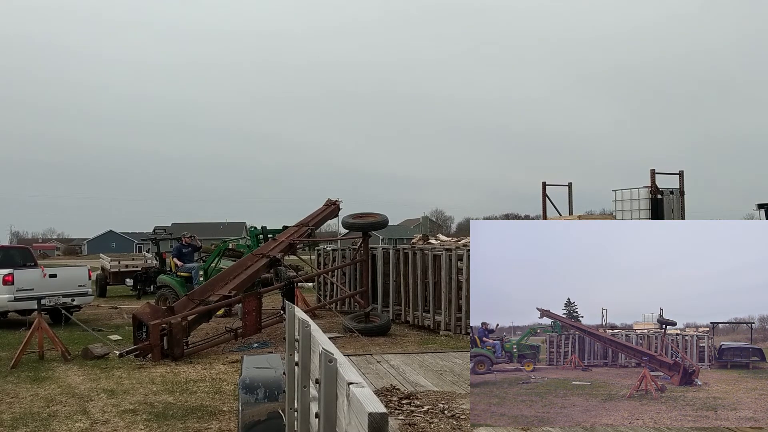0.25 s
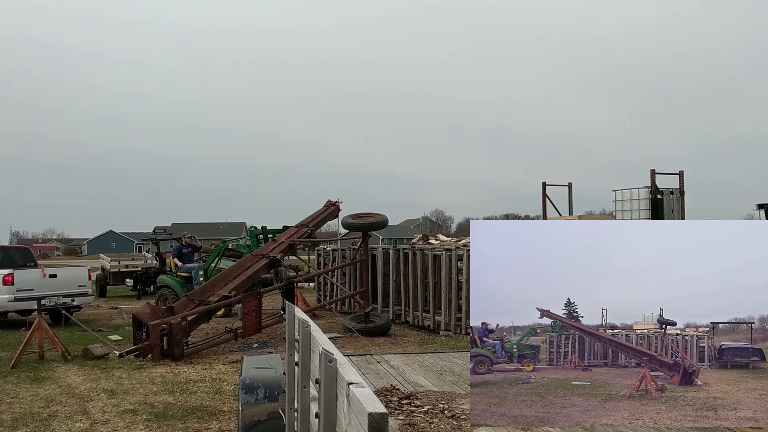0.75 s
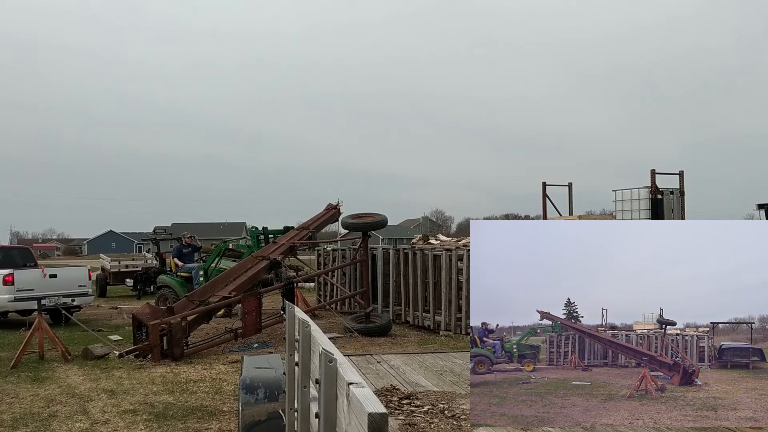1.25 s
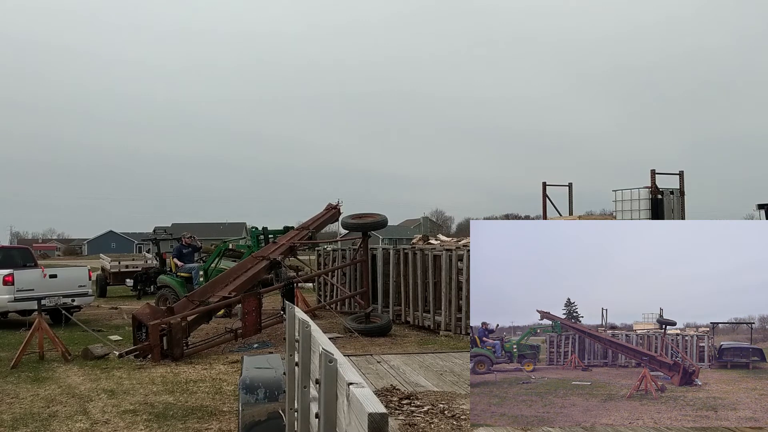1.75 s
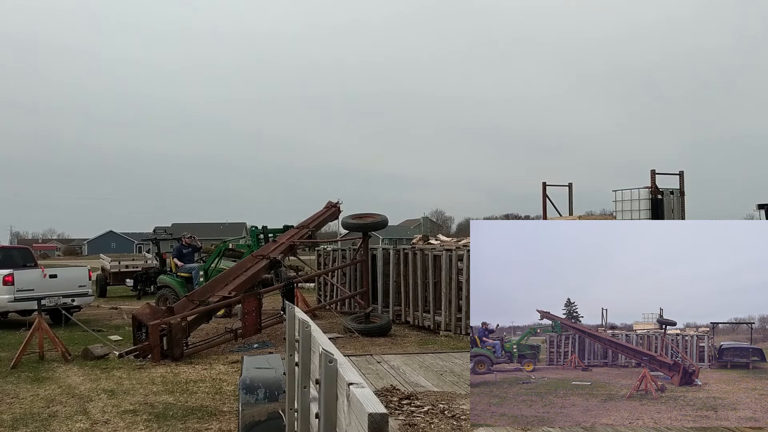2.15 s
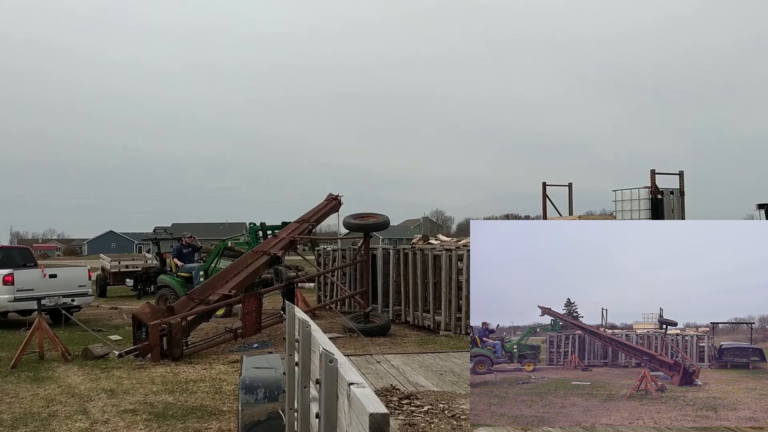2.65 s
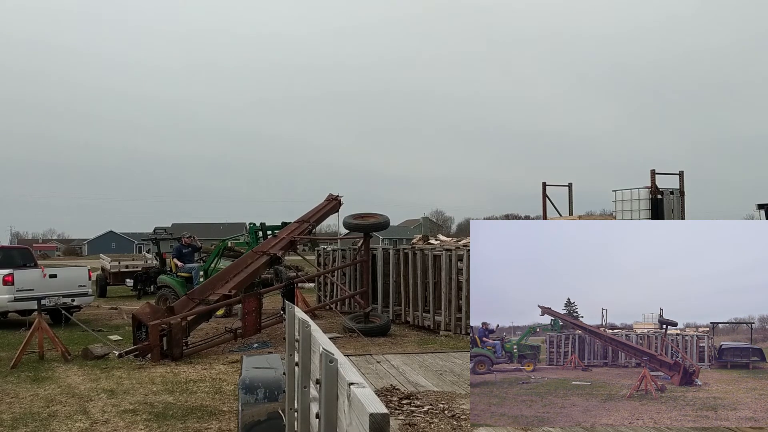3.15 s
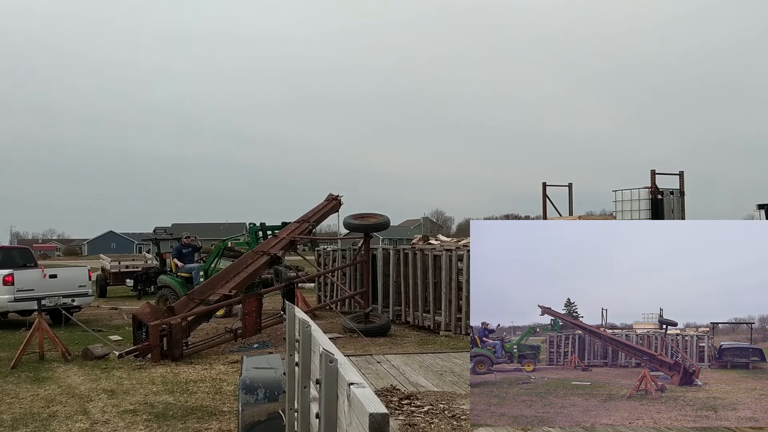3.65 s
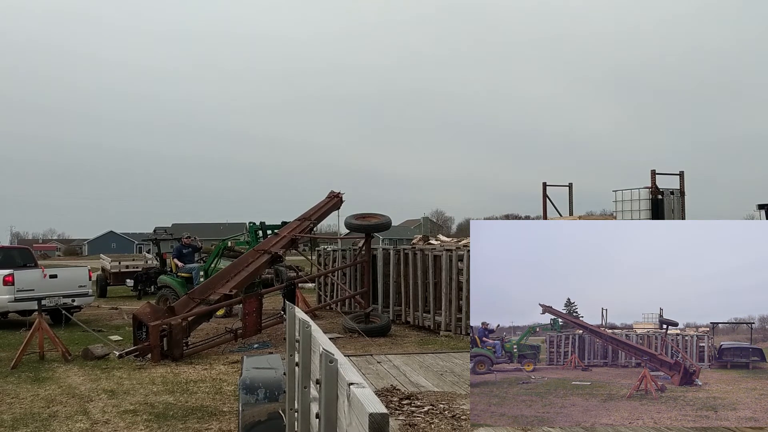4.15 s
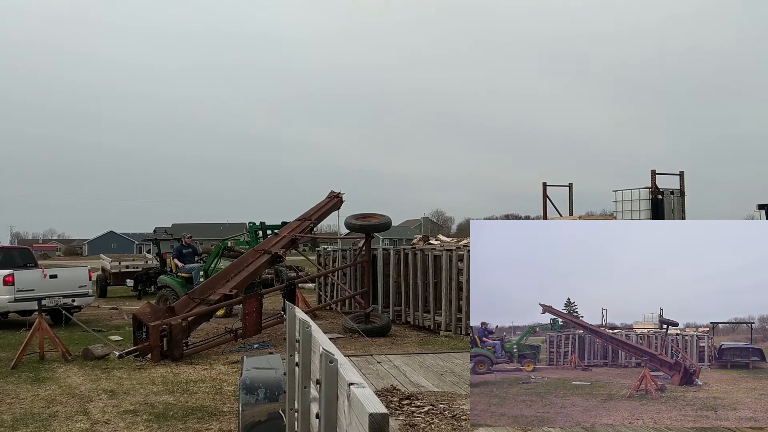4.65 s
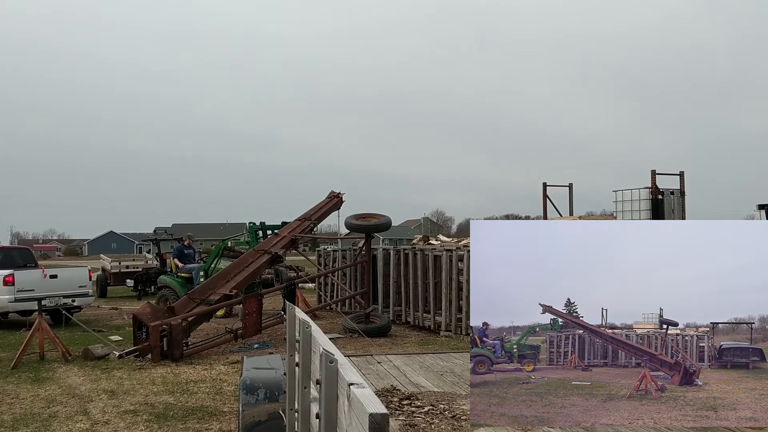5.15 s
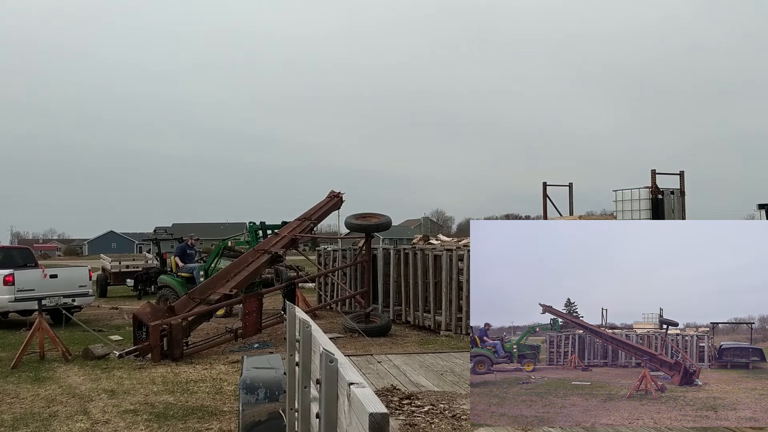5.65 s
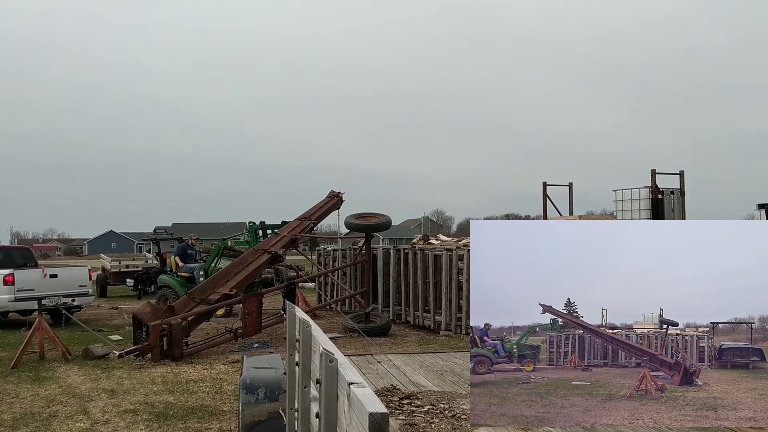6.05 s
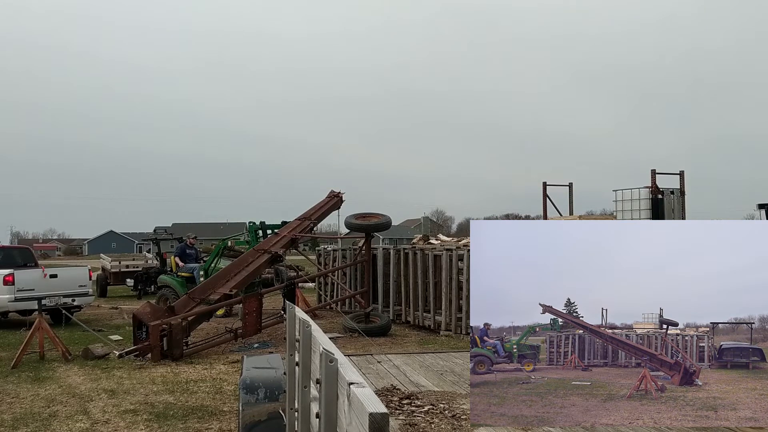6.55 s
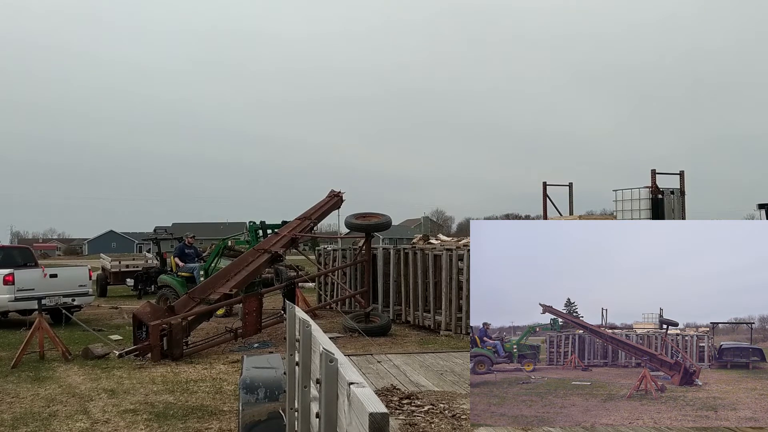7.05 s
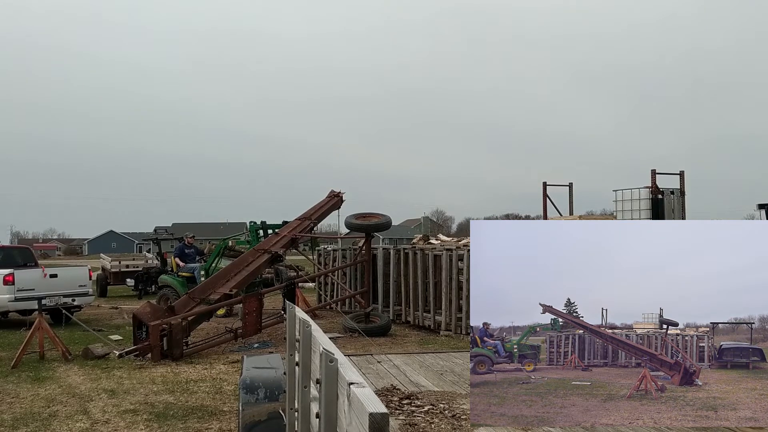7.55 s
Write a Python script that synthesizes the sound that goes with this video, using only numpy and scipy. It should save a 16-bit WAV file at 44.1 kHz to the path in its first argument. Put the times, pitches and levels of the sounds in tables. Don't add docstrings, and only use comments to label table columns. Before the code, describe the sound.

A three-cylinder diesel tractor idles along steadily at a moderate distance in an open farmyard, a low droning chug of about 54 firings a second with block clatter and an intermittent loose tappet ping. Wind buffets and thumps the microphone in low soft bumps, most often in the first four seconds. At 1.55 s steel clanks sharply with a puff of rust, then a dull thud. Around 2 s faint ticks lead to the loudest drag, 2.2-2.95 s: rough slow slips, bright ringing sheet and grinding rust, as the engine sags then briefly overshoots. From 3.45 to 4.4 s a longer, lower scrape groans and sings near 400 Hz, with dry flake clicks and a brighter ringing end. Engine and wind continue alone; small bird chirps at 5.65 and 6.0 s, a thin whistle at 7 s. From 7.2 to 7.8 s rapid regular slips become a stuttering squeal. Sheds return a brief echo.

```python
import sys
import numpy as np
from scipy import signal
from scipy.fft import rfft, irfft, next_fast_len
from scipy.io import wavfile
from scipy.ndimage import uniform_filter1d, map_coordinates

SR = 44100
rng = np.random.default_rng(int(sys.argv[2]) if len(sys.argv) > 2 else 0)


def nominal_scale(level):
    x = np.asarray(level, float) / 20
    return 10 ** x


def dump_mix(stems):
    frames = np.atleast_2d(stems).T
    limited = np.clip(frames, -1, 1)
    pcm = np.round(limited * 32767).astype(np.int16)
    wavfile.write(sys.argv[1], SR, pcm)


N = 343980


def noise():
    return rng.standard_normal(N)


def unit(x):
    return x / np.sqrt(np.mean(x ** 2) + 1e-20)


def along(points, hz):
    f, v = np.transpose(points)
    return np.interp(np.log(hz + 1), np.log(f + 1), v)


def curves(rows):
    s, *cols = np.transpose(rows)
    t = np.arange(N) / SR
    gate = uniform_filter1d(1. * (t > s[0]) * (t < s[-1]), size=300)
    return [np.interp(t, s, c) for c in cols] + [gate]


def wobble(rate):
    at = np.arange(0, N + 32, 32)
    knots = rng.standard_normal(int(N * rate / SR) + 4)
    return np.interp(np.arange(N), at, map_coordinates(knots, [at * rate / SR]))


def filtered(x, response):
    m = next_fast_len(len(x) + 8192)
    return irfft(rfft(x, m) * response(np.fft.rfftfreq(m, 1 / SR)), m)[:len(x)]


def modes(peaks, f):
    total = 0
    for k, (c, w, db) in enumerate(peaks):
        total = total + (-1) ** k * nominal_scale(db) * 1j * f * w / (c * c - f * f + 1j * f * w + 1e-9)
    return total


def lifted(peaks, f):
    return nominal_scale(sum(db / (1 + (2 * (f - c) / w) ** 2) for c, w, db in peaks))


def patchy(x, depth_db):
    z = signal.stft(x, nperseg=256)[2]
    field = uniform_filter1d(rng.standard_normal(z.shape), size=4, axis=0)
    field = uniform_filter1d(field, size=7, axis=1)
    return signal.istft(z * nominal_scale(depth_db * unit(field)), nperseg=256)[1][:N]


def bursts(slips, t60):
    hits, t = np.zeros(N), np.arange(4000) / SR
    for s, db in slips:
        hits[round(s * SR)] = nominal_scale(db)
    return signal.fftconvolve(hits, nominal_scale(-60 * t / t60) * (1 - np.exp(-t / 0.0018)))[:N]


def rings(slips, sheet, t60, vary=1):
    out, t = np.zeros(N + SR), np.arange(3000) / SR
    hz, _, level = np.transpose(sheet)[:, :, None]
    chance = vary * rng.standard_normal((len(slips), 3, len(sheet), 1))
    shape = nominal_scale(-60 * t / t60) * (1 - np.exp(-t / 0.0015)) ** 2
    spread = .35 * vary * np.arange(len(sheet))[:, None] ** 2
    for (s, db), (size, tune, phase) in zip(slips, chance):
        turn = 2 * np.pi * hz * (1 + .003 * tune) * (t - .0025)
        ring = nominal_scale(level + size) * np.sin(turn + .45 * phase + spread)
        struck = shape * ring.sum(axis=0)
        out[round(s * SR):][:len(t)] += nominal_scale(db) * struck / abs(struck).max()
    return out[:N]


def wind():
    # t/s, level/dB
    gusts = [(0.0, -22), (0.03, -35), (0.4, -32), (0.8, -36), (1.15, -29), (1.3, -34.5), (1.8, -40.5),
             (2.2, -37), (2.9, -38), (3.3, -37.5), (3.7, -36), (4.2, -35.5), (5.5, -46), (5.7, -36),
             (6.1, -39.5), (6.55, -42), (7.2, -40), (7.8, -36.5)]
    # f/Hz, density/dB per Hz
    buffet = [(12, -56), (20, -31), (34, 10), (65, 8.5), (274, -9.5), (404, -21), (441, -20), (468, -21.5),
              (700, -35.5), (910, -49), (1540, -120)]
    # t/s, peak level/dB, f/Hz
    thumps = [(0.132, -15, 94), (0.155, -14, 67.3), (0.225, -13.5, 150), (0.497, -15.5, 95.5),
              (0.879, -10, 181), (0.984, -16, 91.5), (1.072, -13.5, 136), (1.141, -11, 84.5),
              (1.524, -19.5, 128), (1.595, -12, 126), (1.992, -20.5, 129), (2.299, -16, 111),
              (2.769, -14.5, 121), (2.909, -13, 183), (3.004, -10, 182), (3.18, -14, 198),
              (3.584, -12, 116), (3.62, -10, 152), (3.933, -16, 95), (4.075, -10.5, 107),
              (4.102, -11.5, 65.4), (5.887, -15.5, 136), (5.955, -19, 102), (6.048, -18, 86.1),
              (6.11, -15, 109), (6.281, -20, 61.6), (6.63, -16, 75.4), (6.971, -20, 113), (7.081, -20, 72),
              (3.834, -19, 80), (0.536, -17, 260)]
    swell_db, swell_s = -17, 0.022
    gust_db, _ = curves(gusts)
    t = np.arange(0, N, 64) / SR
    swell = sum(nominal_scale(2 * (db + swell_db)) * np.exp(-((t - s) / swell_s) ** 2) for s, db, _ in thumps)
    strength = np.sqrt(nominal_scale(2 * gust_db) + np.interp(np.arange(N) / SR, t, swell))
    rumble = filtered(noise(), lambda f: nominal_scale(along(buffet, f)))
    power = uniform_filter1d(uniform_filter1d(rumble ** 2, size=1500), size=1500)
    even = rumble / np.sqrt(abs(power) + 1e-9)
    even = filtered(even, lambda f: f ** 6 / (f ** 6 + 46. ** 6))
    out = strength * nominal_scale(1.5 + 1.7 * wobble(25)) * unit(even)
    for s, db, hz in thumps:
        u = np.linspace(-2, 2, round(4 * SR / hz))
        start = round((s + .0105) * SR) - len(u) // 2
        out[start:start + len(u)] += nominal_scale(db - 3.5) * np.sin(2 * np.pi * u) * np.exp(-(u / 0.62) ** 2)
    return out


def bird():
    # t/s, f/Hz, level/dB
    whistle = [(6.935, 3760, -68), (6.955, 3830, -54), (6.99, 3830, -56), (7.01, 3870, -62),
               (7.03, 3892, -53), (7.07, 3885, -57), (7.11, 3885, -62), (7.135, 3970, -66)]
    # t/s, f/Hz, level/dB
    chirps = [
        (5.657, 4300, -51),
        (5.978, 4300, -50),
    ]
    hz, db, gate = curves(whistle)
    t = np.arange(N) / SR
    short = np.zeros(N)
    for s, chirp_hz, level in chirps:
        u = t - s
        short += nominal_scale(level) * np.exp(-(u / .006) ** 2) * np.sin(2 * np.pi * chirp_hz * u * (1 - 3 * u))
    phase = 2 * np.pi * np.cumsum(hz) / SR + .4 * wobble(50)
    return gate * nominal_scale(db + 3.0 + wobble(60)) * np.sin(phase) + short


def turns():
    # t/s, four-stroke cycles/Hz
    speed = [(0, 18.11), (1.7, 18.11), (2.08, 17.6), (2.72, 17.48), (2.86, 18.1), (3.0, 18.36), (3.2, 18.1),
             (3.65, 18.11), (4.1, 18.0), (4.35, 18.115), (7.8, 18.11)]
    return np.cumsum(curves(speed)[0]) / SR


def engine():
    # multiple of the engine cycle, level/dB
    exhaust = [(1, -30), (2, -29), (3, 1), (4, -26), (5, -18), (6, -0.5), (7, -17), (8, -21), (9, -30),
               (10, -14.5), (11, -28), (12, -2), (13, -4.5), (14, -19.5), (15, 0), (17, -12.5), (18, -18.5),
               (20, -27), (22, -33), (24, -8), (25, -15.5), (26, -29), (27, -20), (28, -34), (29, -28.5),
               (30, -37), (31, -25.5), (32, -21), (33, -47), (34, -43)]
    # f/Hz, density/dB per Hz
    block = [(60, -12), (150, -13.5), (250, -10.5), (400, -7), (560, -14.5), (900, -15), (1150, -21.5),
             (2400, -25), (3500, -27.5), (4500, -30), (5800, -24), (6900, -26), (8300, -46.5), (15600, -51)]
    # f/Hz, width/Hz, level/dB
    panels = [(231, 16, 8), (447, 47, -20.5), (842, 17, 7), (1694, 56, 6.5), (2015, 46, 7.5), (2170, 33, 6),
              (2860, 430, 7.5), (5150, 230, 7), (5810, 200, 5), (6270, 200, 0.5), (6730, 150, 3)]
    cylinders = [0, -3, -2.5]
    cycle = turns() + .0015 * wobble(2)
    tones = np.zeros(N)
    for k, db in exhaust:
        sway = nominal_scale(.9 * wobble(5))
        phase = 2 * np.pi * (k * cycle + rng.random()) + 0.5 * wobble(7.3)
        tones += nominal_scale(db) * sway * np.sin(phase)
    firing = 3 * cycle + 3
    count = firing.astype(int)
    since = firing % 1
    uneven = 1.2 * rng.standard_normal(count.max() + 1)[count]
    strength = nominal_scale(np.array(cylinders)[count % 3] + uneven)
    knock = strength * (1 - np.exp(-7 * since)) * np.exp(-2.5 * since)
    steps = round(SR / 18.105)
    habit = rng.standard_normal(steps + 1)[(cycle % 1 * steps).astype(int)]
    habit = filtered(habit, lambda f: 1 / (1 + (f / 4000) ** 4))
    mix = noise() + 1.3 * habit
    colour = lambda f: nominal_scale(along(block, f)) * lifted(panels, f)
    above = lambda f: colour(f) * f ** 2 / (f ** 2 + 1500.0 ** 2)
    roar = unit(filtered(noise() + .6 * np.roll(habit, 700), colour))
    clatter = unit(filtered(unit(knock * mix), above))
    out = nominal_scale(-32.0) * unit(tones)
    out += nominal_scale(-44.0) * patchy(roar, depth_db=1.0)
    return out + nominal_scale(-54.5) * patchy(clatter, depth_db=4.5)


def tappet():
    s = np.interp(np.arange(.22, turns()[-1] - 1, 2 / 3), turns(), np.arange(N) / SR)
    fits = 3.2 * wobble(6)[(s * SR).astype(int)] + 2.5 * rng.standard_normal(len(s))
    return rings(np.transpose([s, fits - 49]), [(2720, 0, -3), (2880, 0, 0), (3050, 0, -4)], t60=.045)


def yard(x):
    # f/Hz, t60/s
    decay = [(300, 0.24), (3000, 0.34), (10000, 0.019)]
    hz, t, z = signal.stft(rng.standard_normal(SR // 2), SR, nperseg=256)
    tail = signal.istft(z * nominal_scale(-60 * t / along(decay, hz)[:, None]), SR, nperseg=256)[1]
    return signal.fftconvolve(np.pad(x, (800, 0)), tail / np.linalg.norm(tail))[:N]


def snaps():
    # t/s, peak level/dB, low part/dB
    flakes = [(3.4695, -39, 11), (3.6354, -34.5, 2), (3.7461, -40, 3), (3.838, -41, 6), (3.8819, -41, 3),
              (4.0595, -44, 2), (4.1518, -46, 6), (4.1687, -43, 10), (4.2205, -38, 14), (4.255, -42, -1),
              (4.2627, -41, -3)]
    high = bursts([(s, db) for s, db, _ in flakes], .02)
    low = bursts([(s, db + low_db) for s, db, low_db in flakes], 0.035)
    top = filtered(high * noise(), lambda f: nominal_scale(7.5) / (1 + (8500 / (f + 1)) ** 6))
    return top + filtered(low * noise(), lambda f: nominal_scale(13.0) * f / (f + 900) / (1 + (f / 6000) ** 6))


def creep():
    # f/Hz, width/Hz, level/dB
    tick_modes = [(5600, 0, -8), (5800, 0, -3), (6200, 0, -5)]
    s = np.arange(1.96, 2, 0.028)
    db = np.interp(s, (1.96, 2), (-47, -35)) + 2.0 * rng.standard_normal(40)[:len(s)]
    return rings(np.transpose([s, db]), tick_modes, t60=0.098)


def jolt():
    # t/s, peak level/dB
    tug = [
        (1.5475, -21.5),
    ]
    # f/Hz, width/Hz, level/dB
    tug_modes = [(750, 88, 0), (2080, 31, -5), (4480, 31, -2), (5180, 38, -13), (5930, 34, -1),
                 (6350, 35, -12), (6800, 34, -2), (7400, 40, -8), (10600, 65, -21)]
    # f/Hz, width/Hz, level/dB
    thud_modes = [(200, 0, -11), (278, 0, 7), (375, 0, 3)]
    dust = lambda f: f / (f + 500) / (1 + (f / 7400) ** 10) + nominal_scale(-25)
    puff = filtered(bursts(tug, 0.17) * noise(), dust)
    thud = rings([(1.614, -16.5), (1.623, -20.5)], thud_modes, t60=0.031)
    return rings(tug, tug_modes, t60=0.036) + nominal_scale(-7.5) * puff + thud


def strained(rows, rough, rate):
    hz, db, gate = curves(rows)
    level = nominal_scale(db + 2.5 + 3.5 * wobble(rate))
    return gate * level * np.sin(2 * np.pi * np.cumsum(hz) / SR + rough * wobble(rate))


def squeal(rows, upper_db, rough):
    hz, db, octave_db, gate = curves(rows)
    phase = 2 * np.pi * np.cumsum(hz) / SR + rough * wobble(60)
    flicker = lambda: nominal_scale(2.7 * wobble(45))
    high = 0.69 * flicker() * np.sin(3 * phase) + flicker() * np.sin(4 * phase)
    upper = flicker() * np.sin(2 * phase) + nominal_scale(upper_db) * high
    return gate * (nominal_scale(db + 1.5) * flicker() * np.sin(phase) + nominal_scale(octave_db - 4.0) * upper)


def resting(slips):
    rest_s, db_per_s, most_db = .021, 400, 6
    s, t = np.sort([0.] + [s for s, _ in slips]), np.arange(N) / SR
    since = t - s[np.searchsorted(s, t, side="right") - 1]
    return uniform_filter1d(np.clip(db_per_s * (since - rest_s), 0, most_db), size=60)


def drag(rows, slips, sheet, edge, vary, frame, strut, share, strut_db, rub_db, slip_db, crack_db, t60):
    # f/Hz, density/dB per Hz
    rust = [(1760, -66), (3000, -7), (3420, -14), (3820, -10.5), (4290, -7), (4920, -6.5), (6100, -3.5),
            (7000, 0), (8250, -20.5), (8840, -23.5), (10800, -22), (11900, -27.5), (15600, -33)]
    grate_db, groan_db, gate = curves(rows)
    middle_db = share * grate_db + (1 - share) * groan_db + strut_db
    norm = lambda x: x / np.sqrt(np.mean(x[gate > .5] ** 2))
    jerk = bursts(slips, t60)
    bright = lambda f: nominal_scale(along(rust, f)) * lifted(edge, f)
    rub = unit(filtered(noise(), lambda f: bright(f) * (2.0 + abs(modes(sheet, f)))))
    crack = unit(filtered(noise(), bright))
    effort = gate * nominal_scale(grate_db + rub_db - resting(slips) + 1.0 * wobble(160))
    grate = effort * patchy(rub, depth_db=2.5) + nominal_scale(crack_db) * jerk * crack
    pulse = gate * (4.3 + norm(jerk / nominal_scale(grate_db)))
    body = lambda f: modes(frame, f) + 0.26 * f * f / (f * f + 180.0 ** 2) / (1 + (f / 1400) ** 2)
    bars = lambda f: modes(strut, f) + 0.4 * f * f / (f * f + 1150.0 ** 2) / (1 + (f / 3800) ** 4)
    groan = nominal_scale(groan_db + 2.5) * norm(filtered(pulse * noise(), body))
    middle = nominal_scale(middle_db - 3.0) * norm(filtered(pulse * noise(), bars))
    return grate + nominal_scale(slip_db) * rings(slips, sheet, t60, vary) + groan + middle


def first_drag():
    # t/s, rubbing effort/dB, load on the frame/dB
    stroke = [
        (2.225, -39, -41),
        (2.237, -22.5, -38.5),
        (2.32, -21, -35),
        (2.545, -17, -36.5),
        (2.605, -19, -39.5),
        (2.72, -26.5, -35),
        (2.861, -31, -44.5),
        (2.873, -28, -45),
        (2.95, -44, -49),
    ]
    # t/s, peak level/dB
    slips = [(2.2355, -17.5), (2.2598, -18), (2.2711, -17), (2.2828, -18), (2.3008, -16), (2.3143, -16),
             (2.3286, -14), (2.3484, -15), (2.3681, -13), (2.387, -17), (2.4057, -15), (2.4265, -15),
             (2.4514, -16), (2.4679, -16), (2.4863, -12), (2.5048, -18), (2.5254, -17), (2.5498, -15),
             (2.5685, -14), (2.5889, -11), (2.6104, -9), (2.6315, -18), (2.6569, -14), (2.6794, -19),
             (2.7048, -21), (2.7314, -19), (2.7877, -26), (2.8643, -23)]
    # f/Hz, width/Hz, level/dB
    sheet = [(4100, 150, -16), (4480, 89, -10), (4850, 60, -16), (6110, 54, -2), (5880, 59, -2.5),
             (6116, 80, -1), (6480, 60, -8), (6670, 53, -5), (6770, 66, -1.5), (7160, 80, -12),
             (9840, 97, -23.5), (10700, 170, -23.5), (13000, 120, -29)]
    edge = [(9900, 150, 4), (10400, 200, 6), (13000, 200, 6)]
    frame = [(283, 54, -1), (525, 98, -3), (690, 105, -3), (1035, 210, -6)]
    strut = [(1790, 49, -10), (2096, 24, 5), (2440, 53, -7), (2940, 60, -1.5)]
    # t/s, f/Hz, level/dB
    brace = [(2.24, 2130, -48), (2.346, 2090, -43), (2.488, 2310, -40), (2.542, 2230, -45),
             (2.604, 2280, -40), (2.668, 2320, -44), (2.75, 2220, -52)]
    # t/s, f/Hz, level/dB
    rivets = [
        [(2.68, 7880, -61), (2.71, 7780, -52), (2.745, 7780, -56), (2.775, 7900, -53), (2.87, 7700, -62)],
        [(2.72, 7040, -50), (2.79, 7100, -40), (2.83, 7050, -57), (2.92, 7000, -57)],
    ]
    out = drag(stroke, slips, sheet, edge, .7, frame, strut, share=0.67, strut_db=-7.5,
               rub_db=-9.5, slip_db=1.5, crack_db=-13, t60=0.041)
    out += strained(brace, rough=2.2, rate=140)
    return out + sum(strained(rows, rough=.6, rate=50) for rows in rivets)


def second_drag():
    # t/s, rubbing effort/dB, load on the frame/dB
    stroke = [(3.46, -53, -46), (3.476, -32, -31), (3.486, -39, -41), (3.518, -33.5, -31.5),
              (3.568, -38.5, -35.5), (3.61, -30.5, -32), (4.002, -29.5, -31.5), (4.018, -35, -38),
              (4.03, -34, -20.5),
              (4.031, -28.5, -30), (4.103, -31, -30), (4.127, -37, -34), (4.155, -29, -34),
              (4.215, -32.5, -29.5), (4.293, -23, -42.5), (4.309, -23, -47), (4.321, -27, -40),
              (4.42, -47, -58)]
    # t/s, peak level/dB
    slips = [(3.4711, -26), (3.5165, -30), (3.5327, -29), (3.5538, -35), (3.5768, -30), (3.6096, -31),
             (3.6303, -25), (3.6627, -24), (3.678, -30), (3.7062, -27), (3.7446, -18.5), (3.7588, -22),
             (3.7788, -26), (3.7907, -28), (3.8045, -25), (3.8189, -29), (3.8355, -20), (3.8577, -20),
             (3.8805, -20), (3.9008, -23), (3.9346, -22), (3.955, -26), (3.967, -25), (3.9782, -25),
             (3.9932, -21), (4.041, -24), (4.0579, -24), (4.0838, -26), (4.0986, -24), (4.1495, -22),
             (4.1707, -20), (4.192, -25), (4.2244, -22), (4.2452, -24), (4.2631, -19), (4.2844, -15),
             (4.319, -18), (4.3394, -20)]
    # f/Hz, width/Hz, level/dB
    sheet = [(4480, 120, -1), (5240, 280, 6), (5770, 330, 9), (6200, 96, 10.5), (6630, 68, 6.5),
             (7000, 71, 3), (9750, 200, -24), (11000, 300, -19)]
    thin_sheet = [(4220, 190, -3), (5400, 59, -16), (6200, 140, -4), (6670, 50, 1), (7900, 79, -17)]
    edge = [(3900, 400, 5.4), (9750, 200, 5), (11200, 200, 5.5)]
    frame = [(380, 72, -4.5), (664, 66, -2.5), (827, 105, -10.5), (1052, 56, -7.5)]
    strut = [(1390, 60, -7), (1580, 46, -3), (2130, 50, -15), (2490, 49, -2.5), (3380, 110, -6),
             (4400, 100, -5.5)]
    # t/s, f/Hz, level/dB
    beam = [
        [(3.53, 386, -35), (3.58, 396, -32), (3.63, 408.4, -31.5), (3.7, 425.6, -29.5), (3.745, 419.4, -40),
         (3.82, 403, -28.5), (3.88, 403, -32)],
        [(3.88, 400, -35), (3.95, 395, -22), (4.04, 387.2, -30), (4.065, 390, -32), (4.1, 395, -24),
         (4.16, 399, -32), (4.19, 396, -31), (4.26, 390, -35)],
    ]
    # t/s, f/Hz, level/dB
    rails = [
        [(3.56, 832, -49), (3.66, 838, -29), (3.72, 835, -38), (3.8, 828, -31.5), (3.85, 830, -40),
         (3.94, 832, -32), (3.98, 825, -42), (4.05, 830, -39), (4.24, 810, -47)],
        [(3.5, 1560, -48), (3.65, 1582, -45), (3.72, 1580, -47), (3.85, 1580, -39), (3.92, 1600, -43.5),
         (4.06, 1565, -39), (4.12, 1560, -50)],
        [(3.6, 1260, -46), (3.66, 1270, -43), (3.82, 1250, -50), (3.95, 1202, -45), (4.1, 1192, -45),
         (4.35, 1190, -49)],
    ]
    # t/s, f/Hz, level/dB
    flange = [(4.225, 10300, -58), (4.26, 10700, -53), (4.29, 10900, -50), (4.33, 10850, -52),
              (4.38, 10600, -62)]
    out = drag(stroke, slips, sheet, edge, 1, frame, strut, share=.4, strut_db=-.6,
               rub_db=-4, slip_db=1, crack_db=-10, t60=0.045)
    last_slips = [slip for slip in slips if slip[0] > 4.22]
    out += nominal_scale(-8.5) * rings(last_slips, thin_sheet, t60=0.13)
    out += sum(nominal_scale(-2) * strained(rows, rough=.5, rate=70) for rows in beam)
    out += sum(strained(rows, rough=.7, rate=70) for rows in rails)
    return out + strained(flange, rough=2.5, rate=500)


def third_drag():
    # t/s, rubbing effort/dB, load on the frame/dB
    stroke = [
        (7.205, -54, -54),
        (7.214, -19.5, -41),
        (7.225, -31, -37.5),
        (7.411, -19.5, -30.5),
        (7.729, -24, -33),
        (7.757, -32, -31),
        (7.8, -37, -48),
    ]
    # t/s, peak level/dB
    slips = [(7.2139, -20), (7.2498, -21.5), (7.2702, -21.5), (7.2911, -21.5), (7.3102, -21), (7.3233, -22),
             (7.3362, -22), (7.3462, -19), (7.3591, -20), (7.3683, -20), (7.3795, -21), (7.3874, -19),
             (7.3964, -19), (7.406, -20), (7.4174, -21), (7.4275, -21), (7.4367, -19), (7.4447, -20),
             (7.4543, -20), (7.4639, -18), (7.4737, -18), (7.4829, -21), (7.492, -18), (7.5017, -20),
             (7.5132, -21), (7.5219, -21), (7.5314, -22), (7.541, -17), (7.5522, -22), (7.5635, -23),
             (7.5713, -21), (7.5848, -21), (7.5964, -21), (7.6146, -22), (7.6321, -20), (7.652, -19),
             (7.6722, -20), (7.6938, -19), (7.717, -20), (7.7252, -27)]
    # f/Hz, width/Hz, level/dB
    sheet = [(2160, 80, -12), (5485, 100, -10), (5730, 89, -4), (6070, 120, 3), (6200, 73, -2),
             (6830, 80, -4), (7200, 73, -12), (10850, 80, -31)]
    edge = [(8370, 200, 2), (10850, 140, 5.1)]
    frame = [(243.4, 17, 12), (320, 31, 10.5), (390, 54, 2.5), (607, 155, 0), (748, 77, 6),
             (975, 200, -0.5)]
    strut = [(1347, 56, -5), (2130, 45, -3), (2850, 33, -20), (3140, 65, -5), (3580, 25, -17)]
    # t/s, f/Hz, level/dB, octave level/dB
    squeal_rows = [(7.21, 696, -34.5, -44), (7.31, 701, -40, -49), (7.35, 690, -31.5, -48),
                   (7.414, 690, -30, -46), (7.464, 700, -38, -46), (7.554, 700, -39, -46),
                   (7.59, 696, -25.5, -48), (7.67, 693, -33.5, -46), (7.77, 700, -32, -50)]
    # t/s, f/Hz, level/dB
    pin = [(7.21, 2160, -44), (7.235, 2160, -52), (7.26, 2160, -47), (7.35, 2150, -50), (7.45, 2150, -47),
           (7.52, 2170, -41), (7.62, 2150, -50)]
    # t/s, f/Hz, level/dB
    strut_hum = [(7.25, 1400, -52), (7.3, 1390, -50), (7.4, 1374, -51), (7.5, 1338, -42), (7.6, 1362, -46),
                 (7.73, 1360, -51)]
    out = drag(stroke, np.add(slips, [.001, 0]), sheet, edge, .25, frame, strut, share=.6, strut_db=-6.5,
               rub_db=-15, slip_db=3, crack_db=-19, t60=.028)
    out += squeal(squeal_rows, upper_db=-14, rough=.7)
    return out + strained(pin, rough=.4, rate=60) + strained(strut_hum, rough=.7, rate=70)


def elevator():
    return jolt() + snaps() + creep() + first_drag() + second_drag() + third_drag()


def scene():
    steel = elevator()
    echo = nominal_scale(-15) * yard(steel)
    return (wind() + bird() + engine() + tappet() + steel + echo)[None]


def roll_off(x):
    return signal.sosfilt(signal.butter(12, 15700, fs=SR, output="sos"), x)


def record(dry):
    hiss = nominal_scale(-67) * rng.standard_normal(dry.shape)
    band = lambda f: (f < 15720) * f ** 4 / (f ** 4 + 36. ** 4)
    mix = filtered(dry[0] + hiss[0], band)[None]
    return roll_off(mix)


dry = scene()
out = record(dry)
dump_mix(out)
```